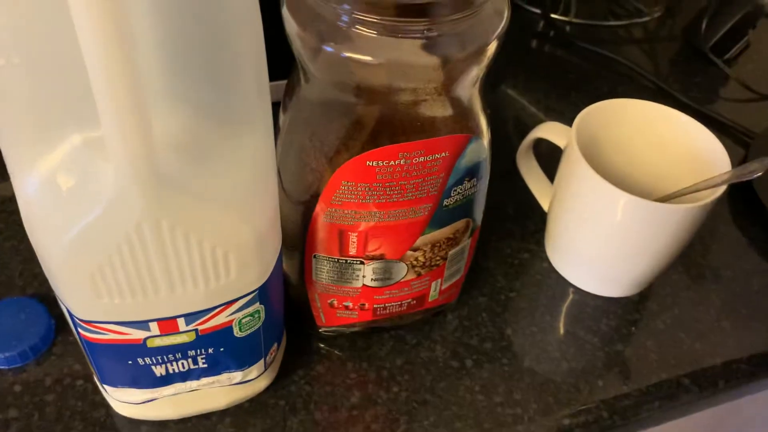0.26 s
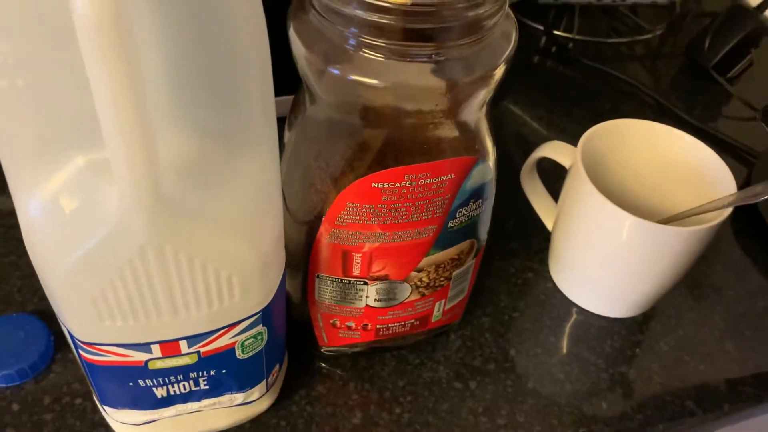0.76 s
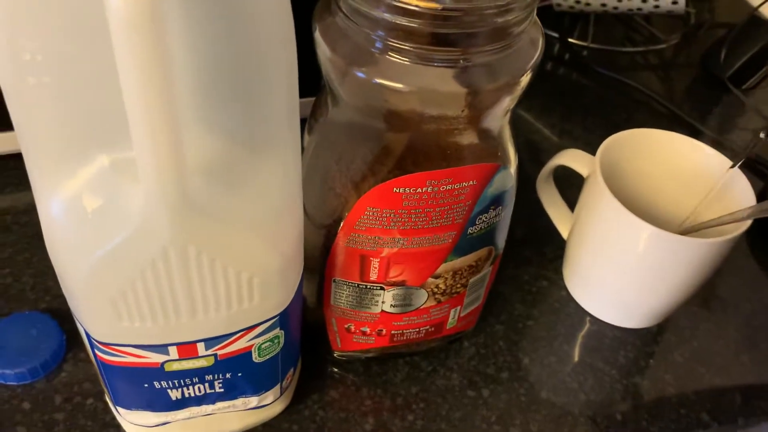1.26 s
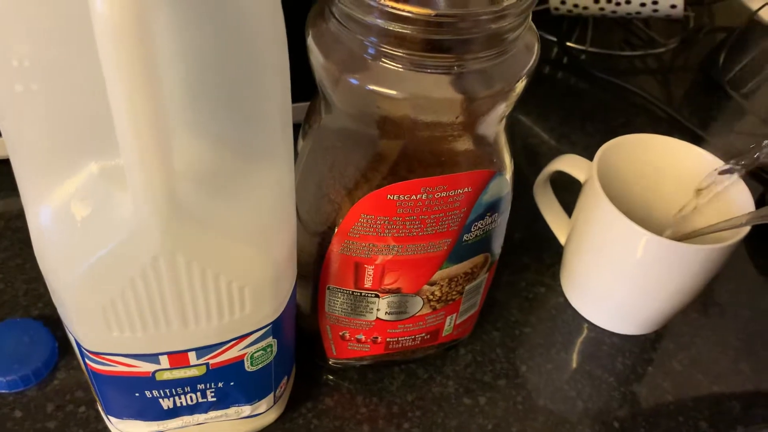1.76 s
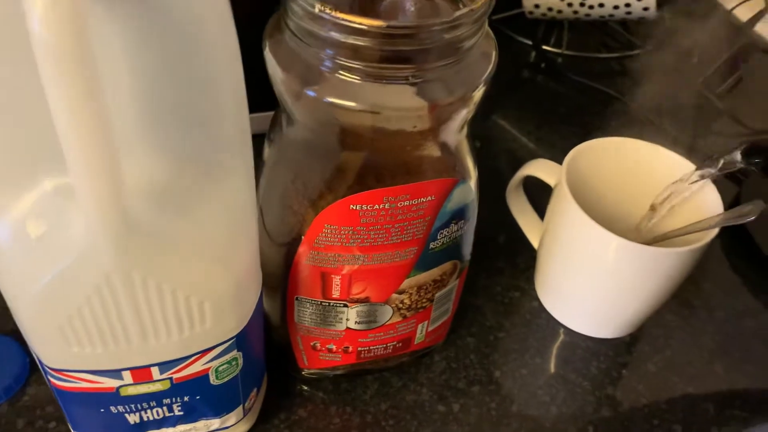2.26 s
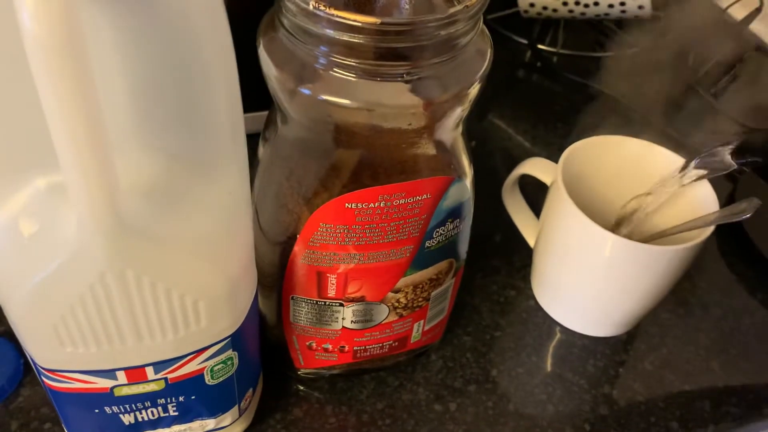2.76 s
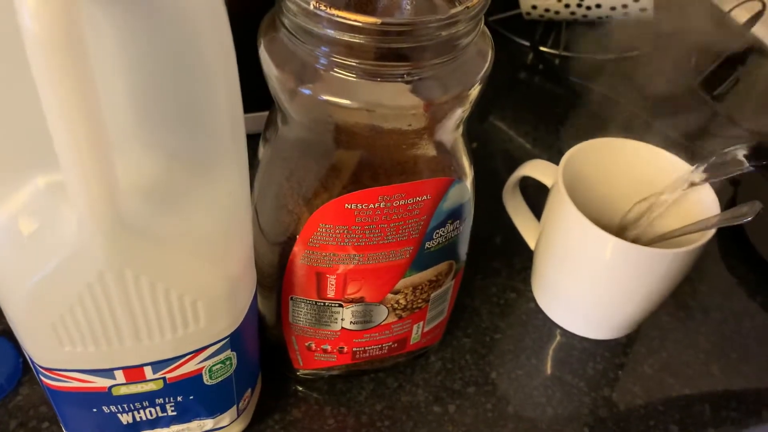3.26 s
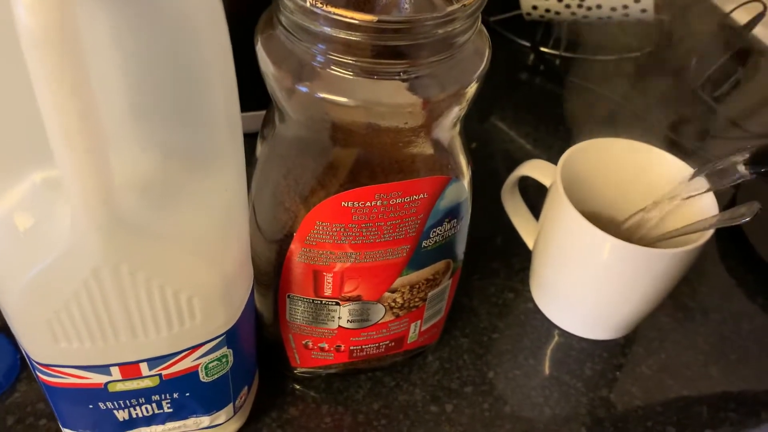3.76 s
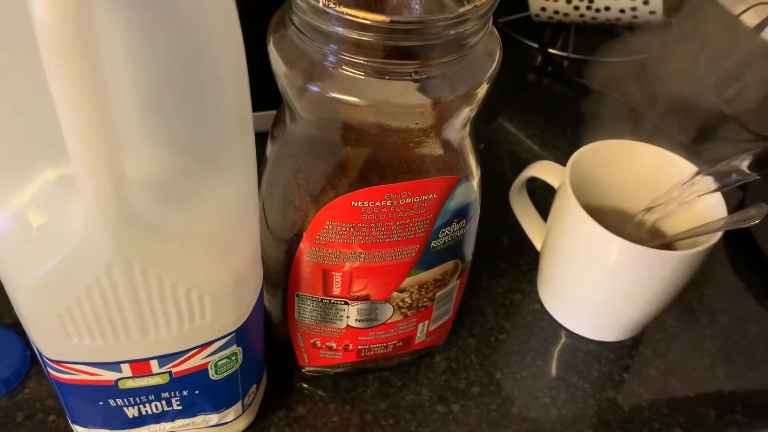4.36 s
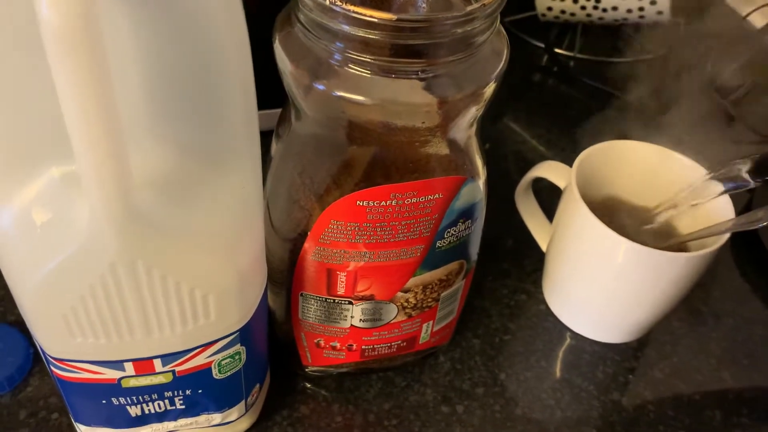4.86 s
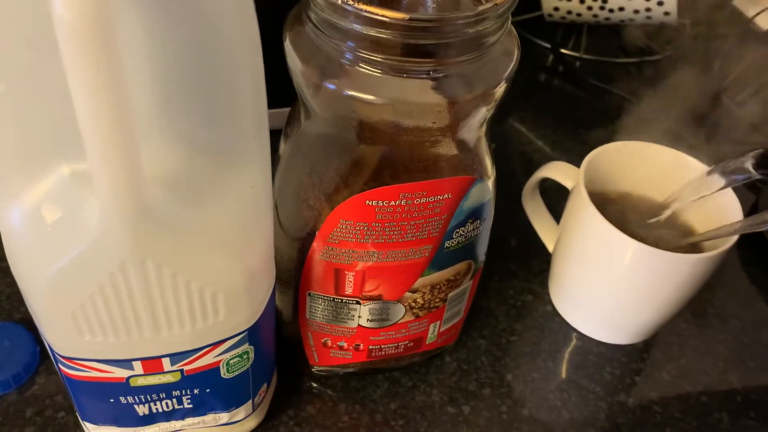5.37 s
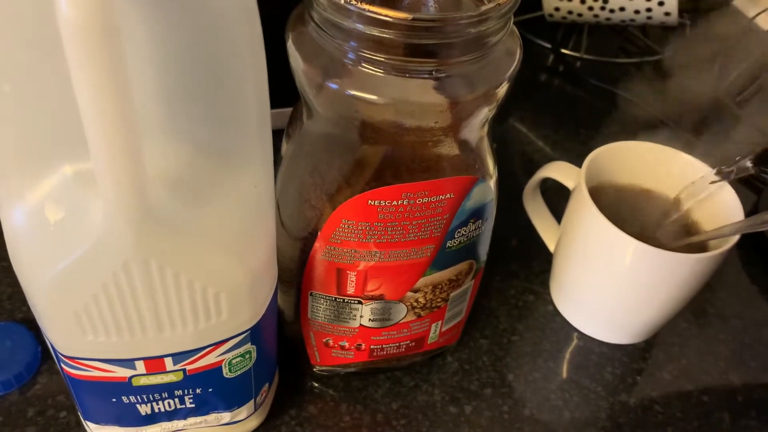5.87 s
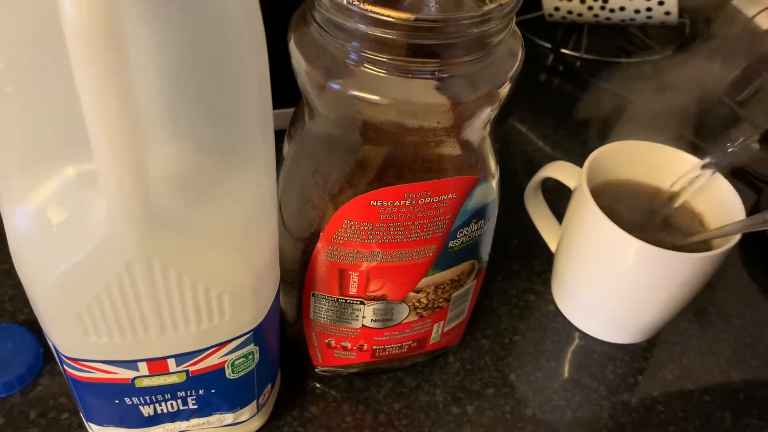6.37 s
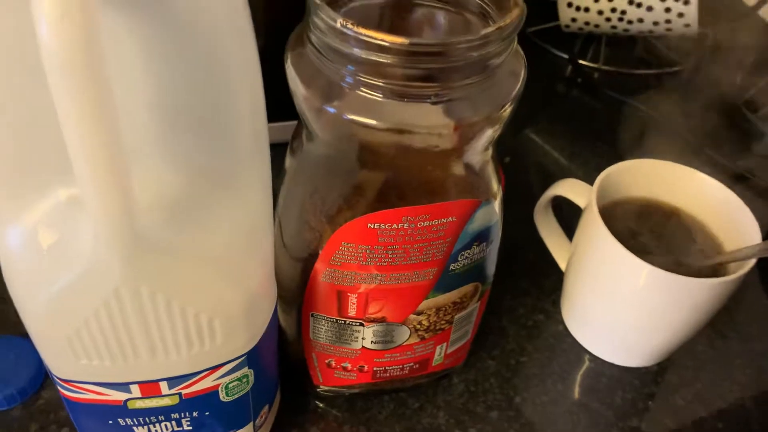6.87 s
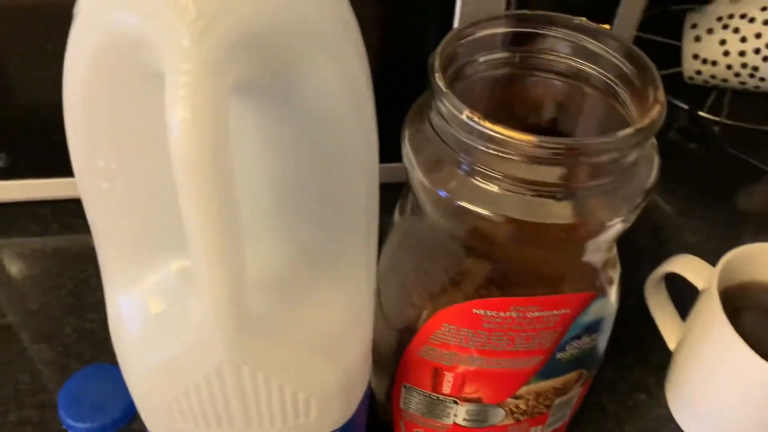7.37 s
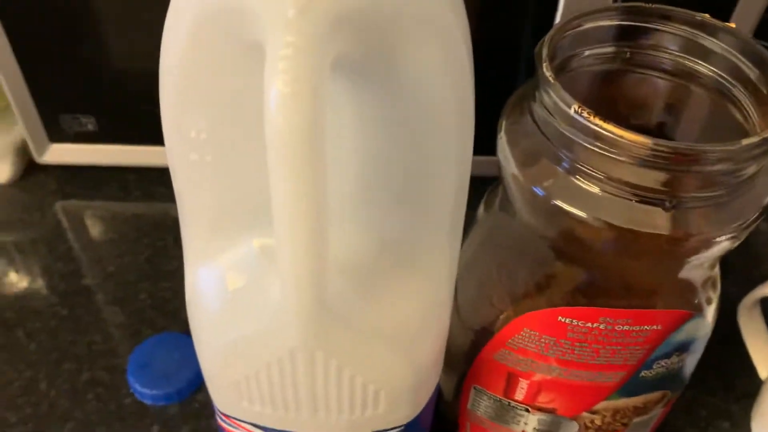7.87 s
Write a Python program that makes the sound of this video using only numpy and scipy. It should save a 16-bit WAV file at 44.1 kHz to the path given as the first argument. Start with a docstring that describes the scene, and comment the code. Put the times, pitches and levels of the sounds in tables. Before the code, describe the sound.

Stereo close pickup in a small, slightly reverberant kitchen. Bright, even steam-like hiss sits toward the right over low room tone. Water starts pouring gently into a mug, bubbling and ringing lightly, with clear plops early and denser splashing midway. It dwindles to final quick drips, then the emptied hand sets the kettle down on the right: a hard double clack, thud and faint rattle.

```python
"""Kettle poured into a mug

A small kitchen, two closely spaced microphones: hot water from an electric kettle trickles into a mug on the worktop.
The stream is ringing mug modes and a crowd of bubbles; plops, drips and low glugs are decaying or swelling tones.
The kettle then clatters down in struck modes and the worktop booms with a slow sway.
Shaped noise makes the steady hot sizzle to the right and the room tone; three low sines make the fridge hum."""
import sys
import numpy as np
from scipy import signal
from scipy.fft import rfft, irfft, next_fast_len
from scipy.io import wavfile

SR = 44100
rng = np.random.default_rng(int(sys.argv[2]) if len(sys.argv) > 2 else 0)


def wav_out(sig):
    """Save sig, one row per channel (or a flat mono array), as 16-bit PCM at SR to the path in sys.argv[1]."""
    wavfile.write(sys.argv[1], SR, np.round(np.clip(np.atleast_2d(sig).T, -1, 1) * 32767).astype(np.int16))


N = 358091
TIME = np.arange(N) / SR  # the whole scene [s]
RING = TIME[:SR // 2]  # the half second that any single sound may last [s]
MIC_LAG_S = .000183  # sound from the right reaches the left microphone this much later
SPRAY_T60_S = .04  # spray of splashes and drips

# What water rings in the mug: (frequency [Hz], level [dB], t60 [s])
MUG_MODES = [(218, -12, 0.018), (290.4, -15, 0.18), (381, -13.5, 0.13), (543, -12, 0.059),
             (616.4, -6, 0.11), (1068, -0.5, 0.077), (1260, 0.5, 0.054), (1479, 4, 0.034),
             (2100, 13.5, 0.0069)]
# Slaps of the stream in the mug: (time [s], level [dB], tilt towards the low modes [dB per octave])
SPLASHES = [(1.906, -52, -7), (3.28, -46, 5), (3.604, -43, -2), (3.797, -46, -1), (3.947, -41, 4),
            (4.003, -43.5, 6), (4.058, -42.5, 1), (4.106, -41.5, 4), (4.165, -45.5, 3), (4.231, -41.5, 7),
            (4.264, -43, 5), (4.296, -42, 3), (4.389, -40, 0), (4.639, -40, 7.5), (4.683, -49, -6),
            (4.699, -40, 3), (5.258, -40.5, 2), (5.601, -44.5, 4), (6.463, -42.5, 6.5), (6.49, -40, 9)]


def stream(splash_db=-9, trickle_db=-5, spray_db=-1):
    """Small impacts ring the mug as the water runs; heavier slaps stand out."""
    shared = patter(per_s=65, spread_db=5.0)  # lumps in the stream strike all modes together
    trickle = np.zeros(N)
    for mode in MUG_MODES:
        strikes = shared + patter(per_s=120, spread_db=5.5)
        trickle += signal.oaconvolve(strikes, ring([mode])[:SR // 10])[:N]
    out = amp(trickle_db) * flow() * unit(trickle)

    # the sloshing surface shifts the modes
    detune = 1 + 0.019 * rng.standard_normal((len(SPLASHES), len(MUG_MODES)))
    for (s, db, tilt_db), shifts in zip(SPLASHES, detune):
        modes = []
        for (hz, level, t60), shift in zip(MUG_MODES, shifts):
            modes.append((hz * shift, level + tilt_db * np.log2(1000 / hz), t60))
        splash = ring(modes) + amp(spray_db) * spray(SPRAY_T60_S, top_hz=2200)
        add(out, s, amp(db + splash_db) * splash)
    return low_cut(out, 190)


# Strength of the running trickle: (time [s], level [dB])
FLOW = [(0.9, -69), (1.2, -60.5), (1.45, -69.5), (1.8, -64), (2.5, -63), (3.8, -58), (4.05, -55),
        (4.45, -59.5), (4.66, -56), (4.95, -59.5), (5.55, -63), (5.95, -67.5), (6.48, -56.5), (6.75, -69)]


def flow():
    """Strength of the stream at every moment, as a gain: straight lines in dB between the points."""
    return amp(np.interp(TIME, *np.transpose(FLOW)))


# How the hollow of the mug colours the small bubbles: (frequency [Hz], level [dB])
HOLLOW = [(640, -1.5), (770, -2), (930, -5), (1090, 2.5)]
# small bubbles carried under by the stream: how many, their pitch range, their level against the flow
GURGLE_PER_S, GURGLE_LOW_HZ, GURGLE_HIGH_HZ, GURGLE_DB = 330, 272, 1797, -8
# a weak stream traps few big bubbles: those under this pitch fade faster as the flow drops
BIG_UNDER_HZ, BIG_FADE_POWER = 870, 0.96


def gurgle(count=36):
    """Small bubbles at many pitches, coloured by the mug; a stronger stream makes them louder and bigger."""
    out, strength = np.zeros(N), flow()
    for hz in np.geomspace(GURGLE_LOW_HZ, GURGLE_HIGH_HZ, count):
        births = patter(per_s=GURGLE_PER_S / count, spread_db=2.5)
        pops = unit(signal.oaconvolve(births, bubble(hz)[:SR // 10])[:N])
        fade_power = BIG_FADE_POWER * max(np.log2(BIG_UNDER_HZ / hz), 0)
        out += amp(read(HOLLOW, hz)) * pops * (strength / strength.max()) ** fade_power
    return amp(GURGLE_DB) * strength * out / np.sqrt(count)


# Large bubbles: (time [s], level [dB], starting pitch [Hz])
BUBBLES = [(1.703, -42.5, 970), (1.882, -37, 885), (1.9, -45, 870), (2.243, -30.5, 876),
           (2.2503, -28.5, 990), (2.399, -27, 1007), (2.4039, -34, 964), (2.419, -40, 990),
           (2.63, -36.5, 996), (2.78, -37.5, 1016), (2.94, -42, 1040), (2.9676, -34.5, 1000),
           (3.009, -38.5, 990), (3.44, -46, 940), (4.03, -41, 1110), (4.242, -47, 580), (4.699, -48, 1060),
           (6.3273, -31, 906), (6.3375, -31, 875), (6.3432, -29, 1006), (6.531, -34, 1070)]


def bubbles(spray_db=-11, mug_db=-26):
    """The large plops, each with a little spray and a nudge to the mug."""
    out, mug = np.zeros(N), ring(MUG_MODES)
    for s, db, hz in BUBBLES:
        droplets = low_cut(spray(t60=0.042, top_hz=2500), 750)
        add(out, s, amp(db) * (bubble(hz) + amp(mug_db) * mug + amp(spray_db) * droplets))
    return out


# a bubble at 1 kHz rings this long [s]; bigger, lower ones ring longer by this power of their size
BUBBLE_T60_S, BUBBLE_SIZE_POWER = .03, .7
BUBBLE_ONSET_S = .0011


def bubble(hz, glide=0.026):
    """A trapped bubble rings briefly, longer if lower, and rises in pitch as it nears the surface."""
    t60 = BUBBLE_T60_S * (1000 / hz) ** BUBBLE_SIZE_POWER
    pitch = hz * (1 + glide * np.minimum(RING / t60, 1))
    turns = np.cumsum(pitch) / SR
    envelope = amp(-60 * RING / t60) * (1 - np.exp(-RING / BUBBLE_ONSET_S))
    return envelope * np.cos(2 * np.pi * turns)


# Separate drops hitting the water: (time [s], level [dB], pitch [Hz], ring t60 [s], relative slap level [dB])
DRIPS = [(1.746, -37, 1680, 0.037, -4), (1.956, -44, 1850, 0.036, 1), (3.2742, -34.5, 1710, 0.027, 3.5),
         (3.7705, -38, 1570, .027, -8), (4.745, -39.5, 1480, .035, -10), (5.1722, -38.5, 1490, 0.027, -2),
         (5.255, -37, 1530, .035, -8), (5.5132, -42, 1480, .028, -10), (6.4564, -36, 1550, .014, -2),
         (6.4801, -25.5, 1580, 0.017, -16), (6.501, -25, 1480, 0.024, 0.5), (6.5278, -25, 1440, 0.011, -14)]
# The bright slap of a drop on the surface: (frequency [Hz], level [dB])
SLAP = [(2080, -1.5), (2600, 3)]
SLAP_T60_S = .011


def drips(mug_db=-24, spray_db=-6, soft_hz=3400):
    """A drop slaps the surface, opens a cavity that sings briefly, rings the mug and throws spray."""
    out, mug = np.zeros(N), ring(MUG_MODES)
    for s, db, hz, t60, slap_db in DRIPS:
        cavity = low_cut(ring([(hz, 0, t60)]), 1240)
        slap = ring([(f, level, SLAP_T60_S) for f, level in SLAP])
        slap = slap + amp(spray_db) * spray(SPRAY_T60_S, top_hz=3020)
        drop = cavity + amp(slap_db) * low_cut(slap, 870) + amp(mug_db) * mug
        add(out, s, amp(db) * drop)
    return colour(out, lambda hz: 1 / np.sqrt(1 + (hz / soft_hz) ** 8))  # water is soft: little treble


def spray(t60, top_hz):
    """A short burst of flying droplets: dying noise between 400 Hz and a top frequency."""
    burst = rng.standard_normal(len(RING)) * amp(-60 * RING / t60)
    return signal.sosfilt(signal.butter(2, [400, top_hz], "band", fs=SR, output="sos"), burst)


# Low glugs of trapped air: (time [s], length [s], level [dB], pitch [Hz])
GLUGS = [(1.169, .08, -61, 321), (1.65, 0.021, -58, 265), (1.758, 0.022, -60, 362),
         (1.833, 0.021, -57, 285), (4.557, .11, -52, 301.4), (6.088, 0.017, -54, 362),
         (6.235, 0.14, -57.5, 271)]


def glugs(rough=0.75, rough_hz=110):
    """A pocket of air hums on a low, rough, burbling note that swells and fades."""
    out = np.zeros(N)
    for s, length, db, hz in GLUGS:
        swell = np.sin(np.pi * np.minimum(RING / length, 1))
        slow_noise = colour(rng.standard_normal((2, len(RING))), lambda f: 1 / (1 + (f / rough_hz) ** 2))
        a, b = unit(slow_noise)
        turn = 2 * np.pi * hz * RING
        note = (1 + rough * a) * np.sin(turn) + rough * b * np.cos(turn)
        add(out, s, amp(db) * swell * note)
    return out


# Contacts of the kettle as it rocks back, then is set down and settles:
# (time [s], level [dB], brightness [Hz], relative weight on the base [dB])
KNOCKS = [(6.347, -36, 1300, -0.5), (7.671, -48.5, 600, 8), (7.8383, -21, 1300, -11),
          (7.8403, -21, 6000, -19), (7.8432, -17.5, 3200, -4), (7.8467, -17.5, 3200, 5.5),
          (7.8610, -34, 1600, 8.5), (7.874, -35, 10000, -3), (7.879, -35, 5500, -10),
          (8.0615, -32, 2500, -8), (8.0655, -26.5, 4170, 2), (8.069, -19, 1900, -11),
          (8.0733, -18.5, 1900, -9), (8.0808, -28.5, 7000, 3), (8.085, -26.5, 4000, -4),
          (8.103, -31, 7000, -3), (8.1072, -24.5, 3200, 0.5), (8.1108, -31, 3000, 0)]
# Modes of the kettle's shell, varied a little at each contact: (frequency [Hz], level [dB], t60 [s])
SHELL = [(690, -2, 0.018), (904, 1.5, 0.02), (1320, -8, 0.028), (1870, -3, 0.017), (2320, -3.5, 0.011),
         (2890, 1, 0.0084)]
# Modes of the kettle's base: (frequency [Hz], level [dB], t60 [s])
BASE = [(323, 1, 0.015), (523, 2, 0.0091)]
# The worktop's first give under a blow: (frequency [Hz], level [dB], t60 [s])
PUSH = [(72, -15.5, 0.047)]
# the kettle's body rings on softly after a blow, in many equal modes
BODY_HZ, BODY_DB, BODY_T60_S = [289, 335, 440, 536, 562, 647, 740, 861, 983, 1046], -31.5, 0.26
# no two contacts strike the same spot: spread of the shell's modes (share of their pitch)
CONTACT_DETUNE = .045
CRACK_T60_S, CHATTER_T60_S = .012, .035


def knocks(crack_db=-4, chatter_db=-20):
    """Contacts crack, ring the shell and shake the loose lid; weight thuds, gives the worktop, rings the body."""
    clatter, weight = np.zeros(N), np.zeros(N)
    detune = 1 + CONTACT_DETUNE * rng.standard_normal((len(KNOCKS), len(SHELL)))
    for (s, db, bright_hz, weight_db), shifts in zip(KNOCKS, detune):
        shell = ring([(hz * shift, level, t60) for (hz, level, t60), shift in zip(SHELL, shifts)])
        crack = amp(crack_db - 60 * RING / CRACK_T60_S) * rng.standard_normal(len(RING))
        chatter = amp(chatter_db) * spray(CHATTER_T60_S, top_hz=3500)
        pole = np.exp(-2 * np.pi * bright_hz / SR)  # a soft contact is dull
        contact = signal.lfilter([(1 - pole) ** 2], [1, -2 * pole, pole ** 2], shell + crack + chatter)
        add(clatter, s, amp(db) * contact)
        add(weight, s, amp([db + weight_db]))
    after = PUSH + [(hz, BODY_DB, BODY_T60_S) for hz in BODY_HZ]
    thud = signal.oaconvolve(weight, ring(BASE))[:N]
    body = signal.oaconvolve(weight, ring(after))[:N]
    return low_cut(clatter, 330), low_cut(thud, 170), body


# Low sway of the worktop:
# (time [s], level [dB], pitch [Hz], relative second mode level [dB], relative shaking of things on it [dB])
BOOMS = [(6.356, -47, 49.7, 2.5, -7), (7.882, -27.5, 52.2, -8, -16), (8.084, -36, 50, 8, -14)]
SWAY_SWELL_S, SWAY_T60_S, RUMBLE_T60_S = 0.0083, 0.52, .33
SECOND_MODE_RATIO, SECOND_MODE_T60_S = 1.9, 0.33


def worktop(rumble_hz=260):
    """The worktop takes the weight, sways at a low pitch and shakes the things that stand on it."""
    out = np.zeros(N)
    for s, db, hz, second_db, shake_db in BOOMS:
        sway = ring([(hz, 0, SWAY_T60_S), (hz * SECOND_MODE_RATIO, second_db, SECOND_MODE_T60_S)])
        noise = rng.standard_normal(len(RING))
        shake = unit(colour(noise, lambda f: (f / rumble_hz) / (1 + (f / rumble_hz) ** 3)))
        shake = amp(shake_db - 60 * RING / RUMBLE_T60_S) * shake
        swell = 1 - np.exp(-RING / SWAY_SWELL_S)
        add(out, s, amp(db) * swell * (sway + shake))
    return direct(out, right_db=2.0)


# The sizzle: (frequency [Hz], level [dB per Hz])
SIZZLE = [(400, -112), (1000, -96.5), (1700, -95), (2350, -90), (3100, -87.5), (4300, -88.5), (7000, -88),
          (9300, -88.5), (11500, -87.5), (13500, -92.5), (16000, -93)]
# Power share of the sizzle that arrives straight, not by the walls: (frequency [Hz], share [0-1])
SIZZLE_DIRECT = [(1000, 0), (3000, 0.59), (6000, 0), (8200, 1), (15000, 1)]


def sizzle(crackle_db=-9, waver_db=1.06):
    """Countless tiny bursts of steam; parts of the treble arrive straight, the rest by the walls."""
    def density(hz):
        return amp(read(SIZZLE, hz)) * np.sqrt(SR / 2)

    def share(hz):
        return read(SIZZLE_DIRECT, hz)
    crackle = unit(patter(per_s=2800, spread_db=10.5))
    bursts = unit(rng.standard_normal(N) + amp(crackle_db) * crackle)
    straight = colour(bursts, lambda hz: density(hz) * np.sqrt(share(hz)))
    near = direct(straight, right_db=-0.5)
    walls = colour(rng.standard_normal((2, N)), lambda hz: density(hz) * np.sqrt(1 - share(hz)))
    far = diffuse(walls, left_db=-0.1)
    waver = unit(colour(rng.standard_normal(N), lambda hz: 1 / (1 + (hz / 14) ** 2)))
    return (near + far) * amp(waver_db * waver)


# Droplets spitting in the sizzle: (time [s], level [dB])
SPITS = [(0.851, -24), (1.439, -23.5)]
TICK_T60_S = .007


def spits(level_db=-5, fizz_db=-14, fizz_t60=.12):
    """A droplet bursts with a bright tick and a short fizz."""
    out = np.zeros(N)
    for s, db in SPITS:
        shape = amp(-60 * RING / TICK_T60_S) + amp(fizz_db - 60 * RING / fizz_t60)
        add(out, s, amp(db + level_db) * shape * rng.standard_normal(len(RING)))
    return direct(colour(out, lambda hz: hz ** 4 / (hz ** 4 + 6500 ** 4)), right_db=1)


# a fridge motor runs just under the mains frequency, so their hums beat
MOTOR_HZ, MAINS_HZ = 49.333, 50


def fridge(waver_db=3.0, motor_db=-74, double_db=-70.5, mains_db=-72.5, in_step_s=.12):
    """The motor's turn, its octave and the mains hum; the last two swell and fade against each other."""
    lines = [(MOTOR_HZ, motor_db), (2 * MOTOR_HZ, double_db), (2 * MAINS_HZ, mains_db)]
    hum = np.zeros(N)
    for hz, db in lines:
        hum += amp(db) * np.sqrt(2) * np.cos(2 * np.pi * hz * (TIME - in_step_s))
    waver = unit(colour(rng.standard_normal(N), lambda hz: 1 / (1 + (hz / 7) ** 2)))  # the hum wavers
    return direct(hum * amp(waver_db * waver), right_db=3.0)


# Background of the kitchen: (frequency [Hz], level [dB per Hz])
ROOM_TONE = [(22, -106), (50, -90.5), (75, -87), (140, -96), (195, -96.5), (270, -91), (420, -98),
             (850, -99), (2000, -99), (6000, -108)]
# Narrow bands of fan drone: (frequency [Hz], width [Hz], level [dB])
DRONE = [(509, 25, -78), (660, 48, -73.5), (1134, 85, -68), (2330, 540, -63)]


def background():
    """Low room noise with a few narrow bands of drone, from all sides."""
    def density(hz):
        power = amp(read(ROOM_TONE, hz)) ** 2
        for f, width, db in DRONE:
            power = power + amp(db) ** 2 * np.exp(-np.pi * ((hz - f) / width) ** 2) / width
        return np.sqrt(power * SR / 2)
    return diffuse(colour(rng.standard_normal((2, N)), density), left_db=3.0)


# Reverberation of the kitchen: (frequency [Hz], t60 [s])
KITCHEN = [(100, 0.087), (400, 0.29), (1000, 0.24), (3000, 0.16), (12000, 0.12)]
TAIL_BUILD_S, TAIL_LEFT_DB = .011, 2.5


def kitchen(x, wet_db, right_db):
    """Direct sound plus a tail that builds up and dies band by band."""
    hz, t, z = signal.stft(rng.standard_normal((2, len(RING))), SR, nperseg=256)
    decay = amp(-60 * t / read(KITCHEN, hz)[:, None])
    tail = signal.istft(z * decay, SR)[1][:, :len(RING)]
    build = 1 - np.exp(-(RING / TAIL_BUILD_S) ** 2)
    tail = diffuse(tail * build, left_db=TAIL_LEFT_DB)
    tail /= np.sqrt(np.sum(tail ** 2) / 2)
    wet = signal.oaconvolve(x[None], tail, axes=1)[:, :N]
    return direct(x, right_db) + amp(wet_db) * wet


# Likeness of reflected sound at the two microphones: (frequency [Hz], correlation [-1 to 1])
LIKENESS = [(60, 0.86), (290, 0.66), (640, -0.5), (1400, -0.093), (2300, 0.8), (3500, 0.064)]


def diffuse(pair, left_db):
    """Turns two unrelated signals into sound from all sides, as alike in each band as the table says."""
    mid = colour(pair[0], lambda hz: np.sqrt((1 + read(LIKENESS, hz)) / 2))
    side = colour(pair[1], lambda hz: np.sqrt((1 - read(LIKENESS, hz)) / 2))
    return np.array([(mid + side) * amp(left_db / 2), (mid - side) * amp(-left_db / 2)])


def direct(x, right_db):
    """Sound from the right reaches the left microphone a little later."""
    late = colour(x, lambda hz: np.exp(-2j * np.pi * hz * MIC_LAG_S))
    return np.array([late * amp(-right_db / 2), x * amp(right_db / 2)])


def ring(modes):
    """Sum of dying modes; neighbours swing in opposite directions."""
    out = np.zeros(len(RING))
    for k, (hz, db, t60) in enumerate(modes):
        out += (-1) ** k * amp(db - 60 * RING / t60) * np.sin(2 * np.pi * hz * RING)
    return out


def patter(per_s, spread_db):
    """Random clicks: many small, a few large."""
    size = amp(spread_db * np.minimum(rng.exponential(1, N), 4))
    return size * rng.choice([-1, 1], N) * (rng.random(N) < per_s / SR)


def low_cut(x, hz):
    """Small things radiate little bass."""
    return signal.sosfilt(signal.butter(2, hz, "high", fs=SR, output="sos"), x)


def colour(x, gain):
    """Filters by a gain that is a function of frequency."""
    length = x.shape[-1]
    size = next_fast_len(length + SR // 10)
    spectrum = rfft(x, size) * gain(np.fft.rfftfreq(size, 1 / SR))
    return irfft(spectrum, size)[..., :length]


def read(points, hz):
    """Reads a table on a log-frequency axis."""
    f, value = np.transpose(points)
    return np.interp(np.log(hz + 1), np.log(f + 1), value)


def add(mix, s, sound):
    """Adds a sound at a time in seconds."""
    part = mix[max(round(s * SR), 0):][:len(sound)]
    part += sound[:len(part)]


def amp(db):
    """Decibels to gain."""
    return 10 ** (np.asarray(db) / 20)


def unit(x):
    """Scales to rms 1."""
    return x / np.sqrt(np.mean(x ** 2) + 1e-20)


def scene():
    """Water and kettle in the kitchen, over the sizzle, the fridge and the room tone."""
    trickle = kitchen(gurgle() + stream() + glugs(), wet_db=-8.0, right_db=-1.5)
    plops = kitchen(bubbles(), wet_db=-11.0, right_db=3.0)
    plops += kitchen(drips(), wet_db=-14, right_db=1.5)
    clatter, thud, body = knocks()
    kettle = kitchen(clatter, wet_db=-9.5, right_db=4.5)
    kettle += kitchen(thud, wet_db=-12, right_db=8)
    kettle += kitchen(body, wet_db=-5.5, right_db=4)
    return trickle + plops + kettle + worktop() + sizzle() + spits() + fridge() + background()


def record(dry):
    """The recorder cuts the deepest bass and the top of the treble."""
    thin = signal.sosfilt(signal.butter(4, 36, "high", fs=SR, output="sos"), dry)
    treble_cut = signal.firwin(801, 15800, window=("kaiser", 9), fs=SR)  # edge at 15.8 kHz
    return signal.oaconvolve(thin, treble_cut[None], "same")


dry = scene()
out = record(dry)
wav_out(out)
```